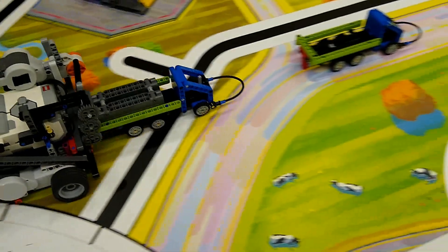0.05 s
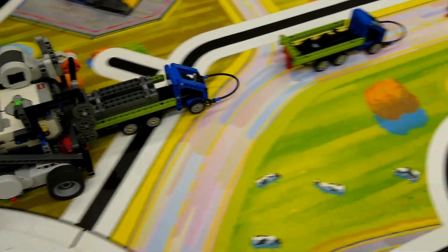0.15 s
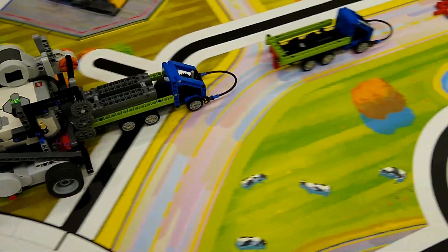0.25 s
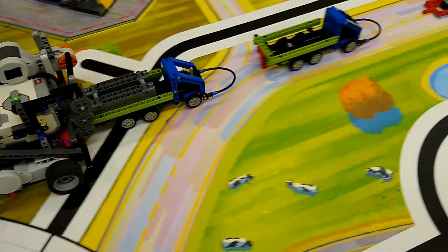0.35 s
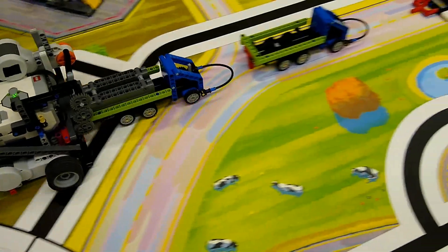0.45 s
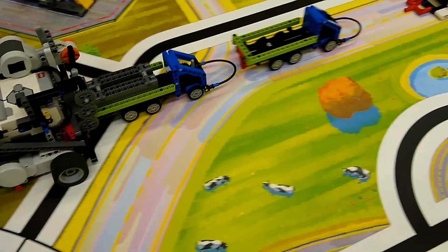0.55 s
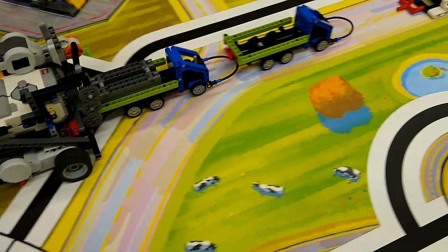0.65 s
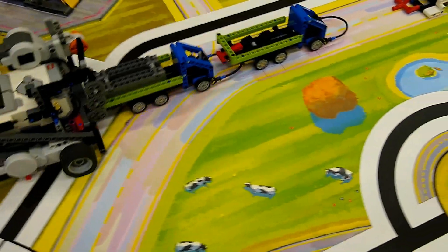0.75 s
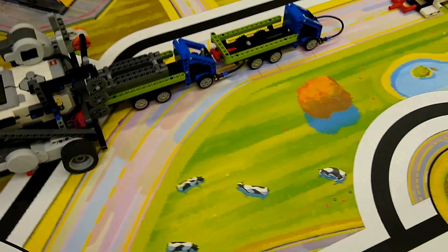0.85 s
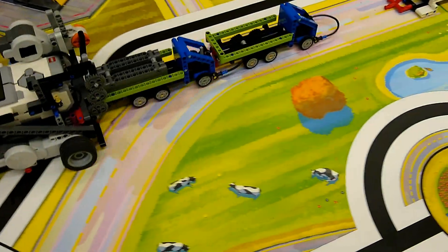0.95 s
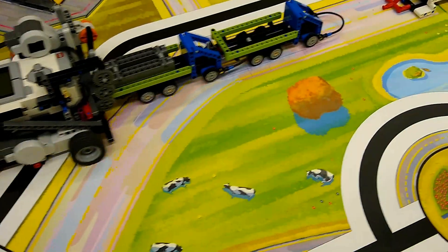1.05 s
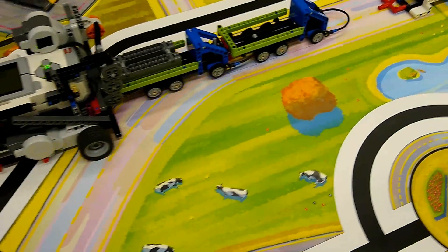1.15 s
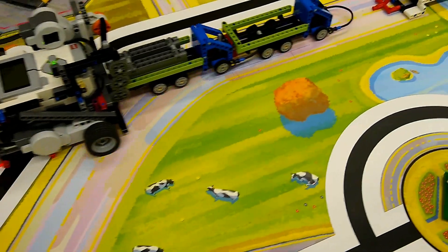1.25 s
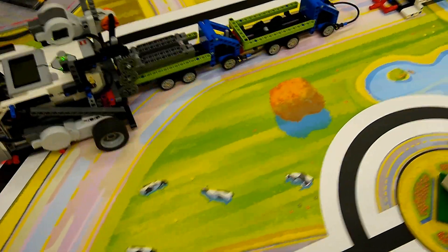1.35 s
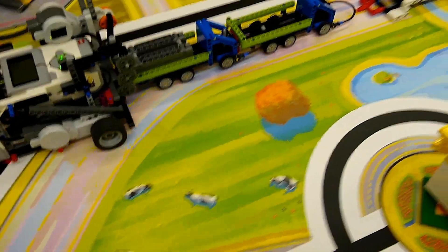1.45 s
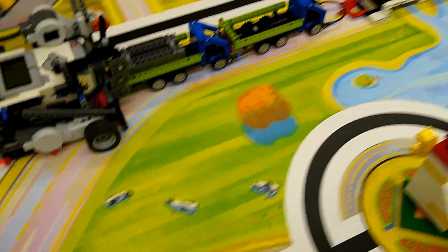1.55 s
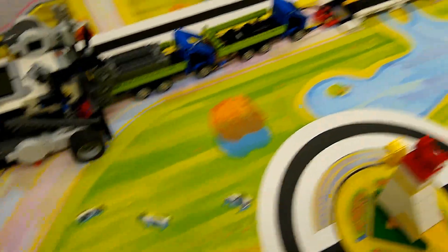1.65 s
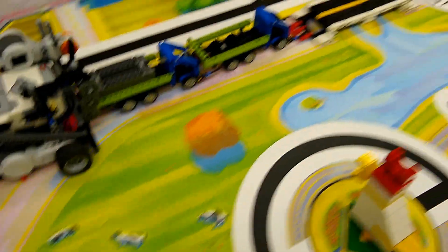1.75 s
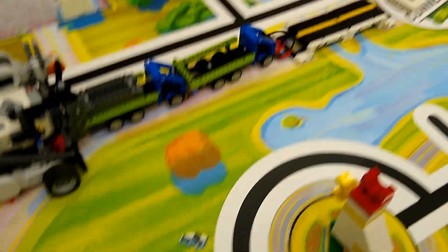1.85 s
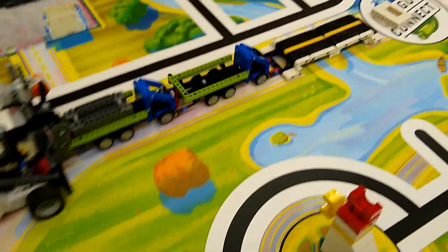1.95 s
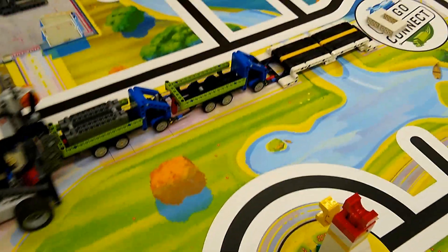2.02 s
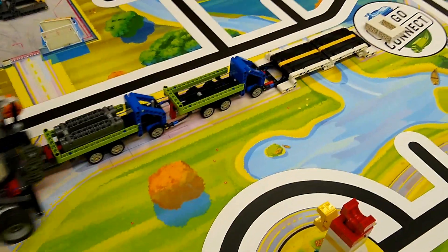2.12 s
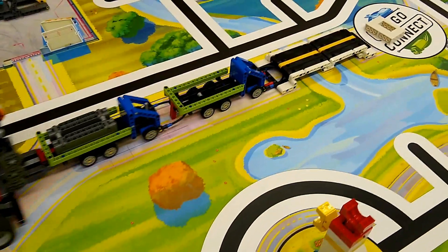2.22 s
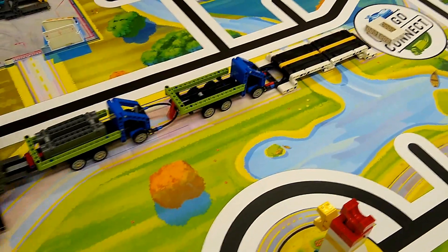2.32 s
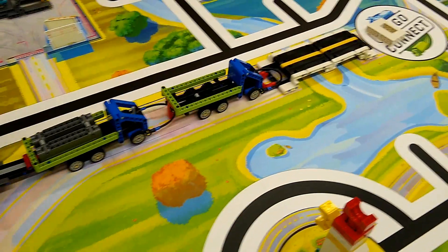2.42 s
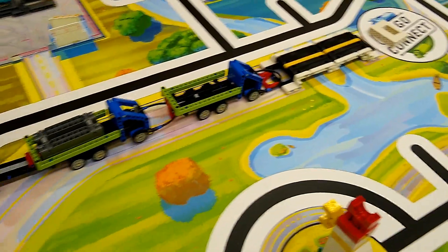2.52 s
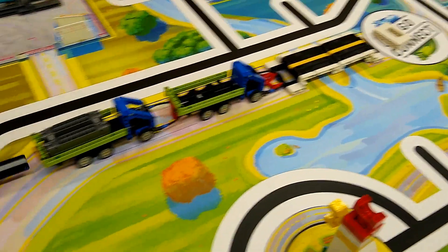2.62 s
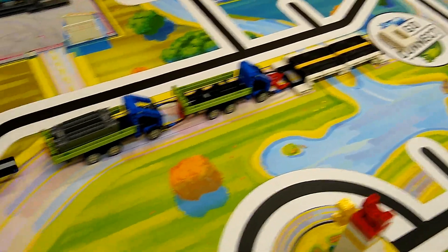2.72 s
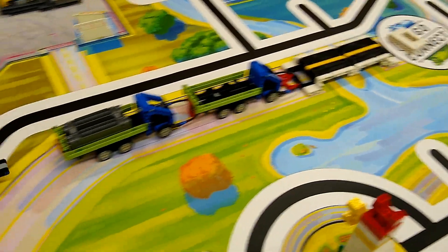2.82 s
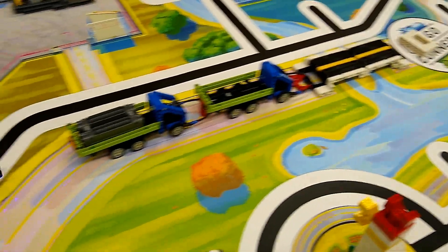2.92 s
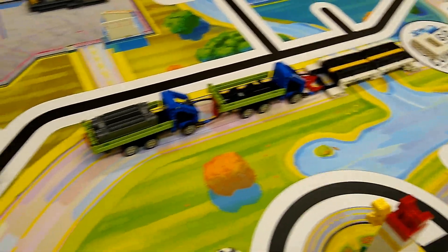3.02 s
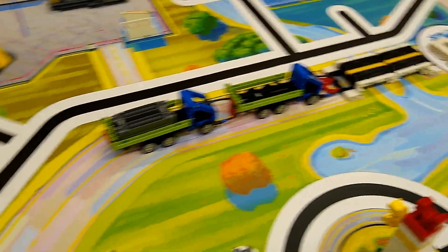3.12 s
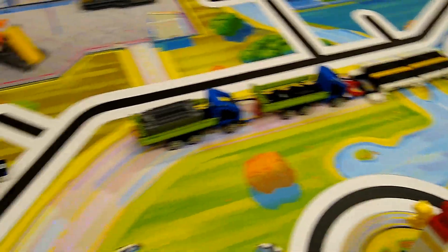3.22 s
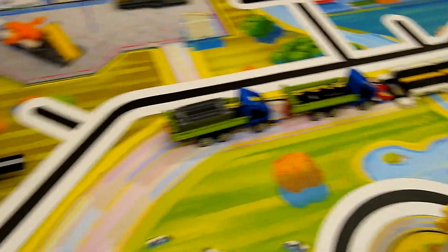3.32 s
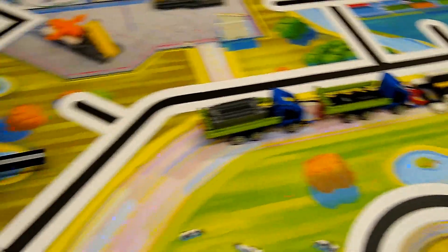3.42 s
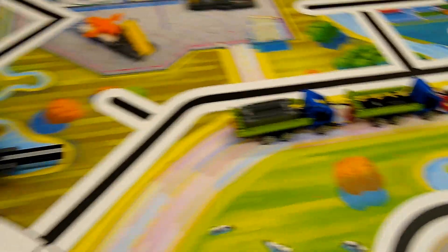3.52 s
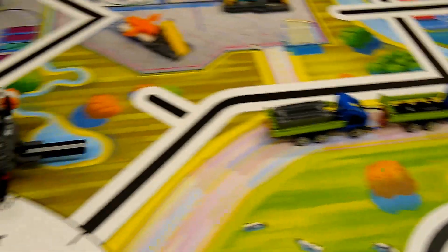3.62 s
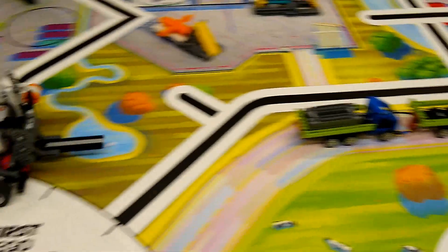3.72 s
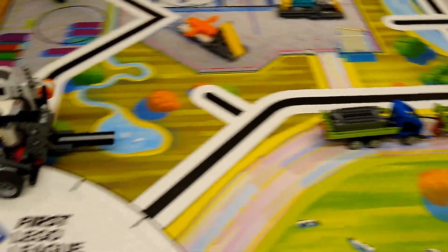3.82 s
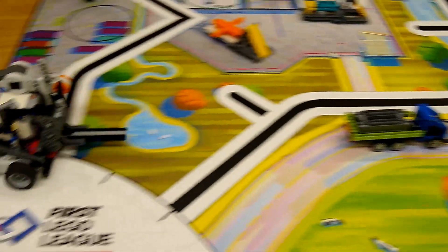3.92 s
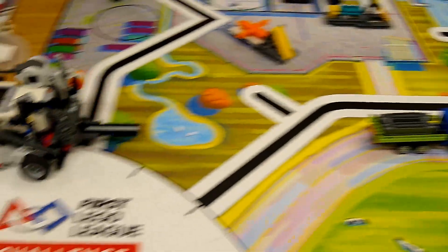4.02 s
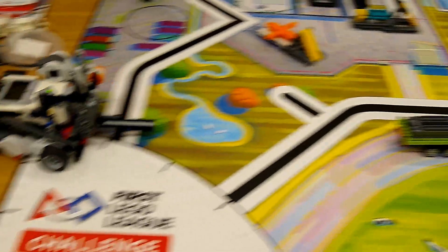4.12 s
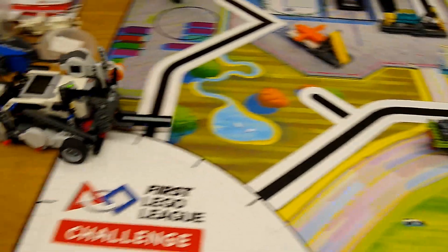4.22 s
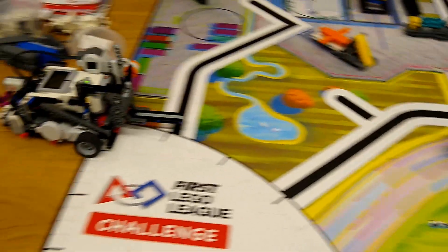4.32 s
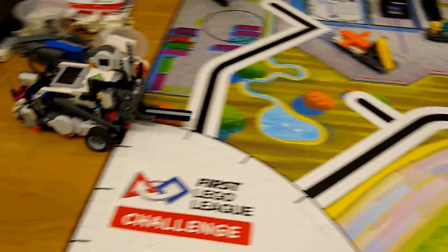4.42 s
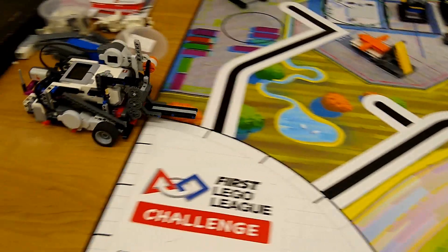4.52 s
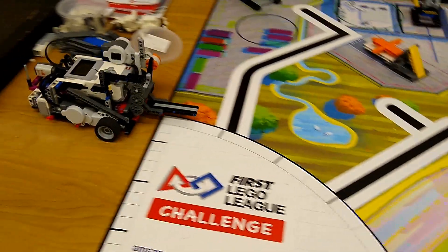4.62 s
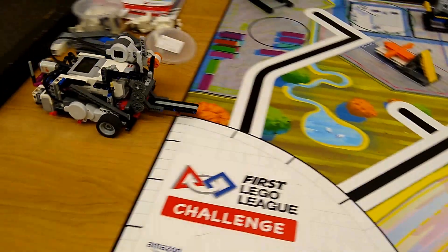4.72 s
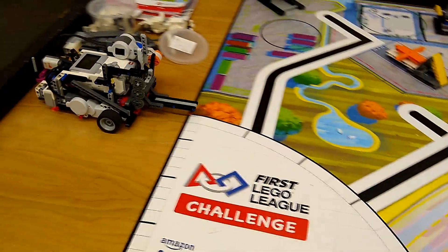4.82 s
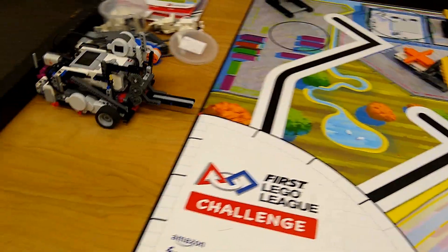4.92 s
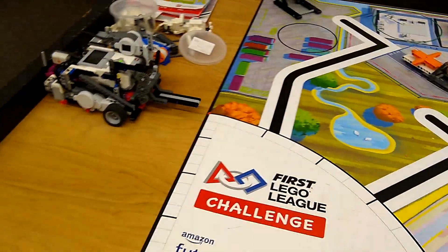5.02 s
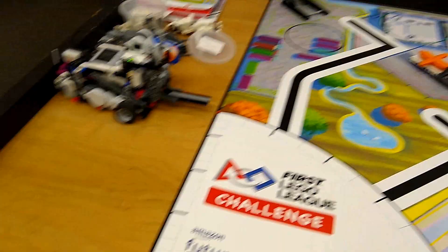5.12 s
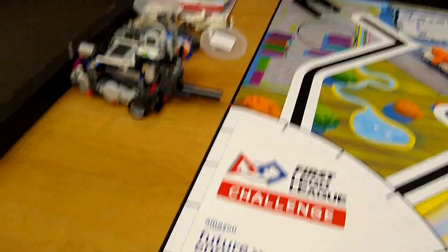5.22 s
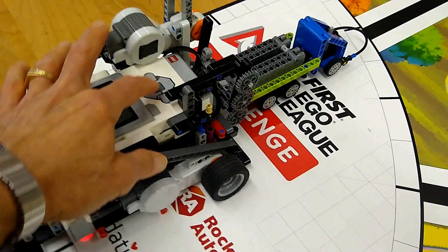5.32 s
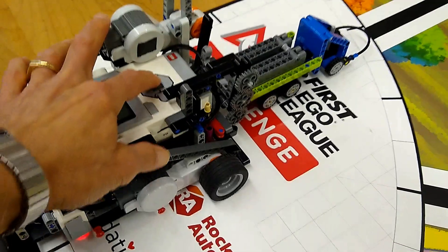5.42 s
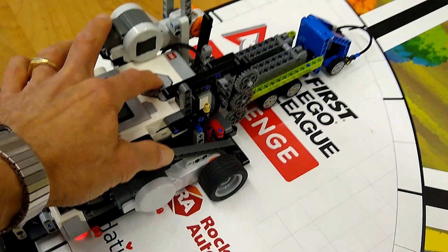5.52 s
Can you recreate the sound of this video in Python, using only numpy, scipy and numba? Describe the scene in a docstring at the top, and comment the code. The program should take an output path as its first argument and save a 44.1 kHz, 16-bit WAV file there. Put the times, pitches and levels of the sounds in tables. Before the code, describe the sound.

A plastic toy robot drives with a buzzing gear whine, pauses briefly, then clicks and backs away at a higher pitch.

```python
"""A plastic toy robot on a table mat, near a two-port microphone, in a quiet room with mains hum and a low
drone. It makes two short pushes forward: the gear teeth of two small motors click once a mesh and ring
the casing, and the mesh whines. At 2 s the gears knock and tick into reverse, and it runs faster,
backwards and away, turning its other face to the microphone. Just after 5 s it stops with two knocks and
the motors whistle faintly, holding still. The level dips briefly and leaves the room duller."""
import sys
import numpy as np
from scipy import signal
from scipy.fft import rfft, irfft
from scipy.io import wavfile
from scipy.ndimage import uniform_filter1d, map_coordinates
from numba import njit

SR = 44100
rng = np.random.default_rng(int(sys.argv[2]) if len(sys.argv) > 2 else 0)


def materialize(psi):
    """Save the field psi as 16-bit PCM at rate SR to the path in sys.argv[1].

    A 1-D psi becomes a single channel; in a 2-D psi each row is a channel.
    """
    bounded = np.clip(np.atleast_2d(psi).T, -1, 1)
    quanta = np.round(bounded * 32767).astype(np.int16)
    wavfile.write(sys.argv[1], SR, quanta)


N = 245195
T = np.arange(N) / SR
REVERSE_S = 2.06

# Gear slack taken up or let go: start_s, peak_db, thump_db, push_s, loose_rattle_db
SLACK_KNOCKS = [(1.991, -34, -77, 0.0076, -69), (2.081, -35, -48.5, 0.016, -47),
                (2.124, -48, -46.5, 0.0044, -53), (5.133, -37, -58, 0.017, -40),
                (5.189, -43, -52, 0.0073, -52)]


def undb(db):
    """Decibels to gain."""
    return 10 ** (np.asarray(db) / 20)


def level(x, db):
    """Scale to an rms level."""
    return x * undb(db) / np.sqrt(np.mean(x ** 2))


def on_log_hz(hz, table):
    """Read a table of pitch_hz, level_db along a log frequency axis."""
    pitch_hz, level_db = np.transpose(table)
    return np.interp(np.log(hz), np.log(pitch_hz), level_db)


def columns(rows):
    """The columns of a timed table, joined by straight lines."""
    time_s, *values = np.transpose(rows)
    return [np.interp(T, time_s, v) for v in values]


def walk(rate):
    """Random levels held 1 / rate s and slewed twice; spread near 1."""
    k = int(SR / rate)
    steps = np.repeat(rng.standard_normal(N // k + 1), k)
    return 1.4 * uniform_filter1d(uniform_filter1d(steps, k), k)[:N]


def sides(pan_db):
    """Gains at the two ports; pan_db is left minus right."""
    return undb(np.array([pan_db, -np.asarray(pan_db)]).reshape(2, -1) / 2)


@njit
def bandpass(x, hz, width_hz):
    """One resonance: a state-variable band-pass, gain 1 at the centre."""
    y, band, low = np.empty(len(x)), 0., 0.
    g, k = np.tan(np.pi * hz / SR), width_hz / hz
    for i in range(len(x)):
        v = (band + g * (x[i] - low)) / (1 + g * (g + k))
        band, low, y[i] = 2 * v - band, low + 2 * g * v, k * v
    return y


def room_tone(port_hz=515, duller_s=5.396, mains_hz=120, drone_hz=94):
    """Background hiss, alike at both ports only below port_hz, with mains hum and a low drone."""
    # Spectrum of the background hiss as heard, with a gap near 2.6 kHz: pitch_hz, relative_db
    hiss_spectrum = [(25, -33), (60, -9), (136, -3.5), (220, -5.5), (390, -8), (620, -10.5), (1240, -13),
                     (1950, -13.5), (2600, -37.5), (4000, -25), (8000, -31), (15500, -46.5)]
    # Swell of the drone: time_s, level_db
    drone_levels = [(0, -77), (.8, -71), (.92, -62), (1.55, -59.5), (1.9, -63), (2.1, -59), (2.4, -63.5),
                    (3.4, -61), (3.95, -61.5), (4.7, -73), (4.83, -58.5), (5.03, -91), (5.15, -59),
                    (5.3, -78)]
    mid, side = rfft(rng.standard_normal((2, N)))
    hz = np.maximum(np.arange(len(mid)) * SR / N, 1)
    apart = 1 / (1 + (port_hz / hz) ** 2.7)
    ports = (mid + apart * side * np.array([[1], [-1]])) / np.sqrt(1 + apart ** 2)
    hiss = level(irfft(undb(on_log_hz(hz, hiss_spectrum)) * ports, N), -56.5)
    dull = signal.sosfilt(signal.butter(1, 500, fs=SR, output="sos"), hiss)
    hiss = np.where(T < duller_s, hiss, dull + undb(-6) * (hiss - dull))
    hum = undb(-65.5 + 2 * walk(10)) * np.sin(2 * np.pi * mains_hz * T)
    rumble = level(bandpass(rng.standard_normal(N), 79., 35.), -7.5)
    drone_gain = undb(columns(drone_levels)[0] + .5 * walk(9.9))
    return hiss + hum + drone_gain * (np.sqrt(2) * np.sin(2 * np.pi * drone_hz * T) + rumble)


def drive(creep_hz=60., teeth_per_wheel_turn=490, catch_up_s=.32, brake_s=.19, strain_s=.13):
    """Two motors spin up, sag once a wheel turn and brake; rattle and whine follow speed and load."""
    # One row a run: start_s, stop_s, cruise_hz (tooth rate), spin_s, catch_up_hz (extra speed),
    # hardest_s (peak load), first_sag_share, second_sag_share, even_db (repeating part of the strikes),
    # loaded_db (its rise under load), rattle_db, whine_db, swell_db (whine under load),
    # surge_db (rattle at spin-up), strain_db (whine at spin-up)
    runs = [(-1, .94, 679, .07, 0, .29, .022, .068, -16, 10, -39.5, -53, 1.2, 0, 0),
            (1.04, 1.965, 662, .11, 320, 1.8, .01, .055, -17, 12, -40.5, -55, 1.5, 2, 5),
            (2.075, 5.088, 1008, .12, 0, 3.8, .04, .045, -18, 2, -36, -61, .5, 0, 11)]
    motors_hz = np.full((2, N), creep_hz)
    detune = np.array([[1], [1.004]])
    rattle_gain, whine_gain, alike_db = np.zeros((3, N))
    for (start_s, stop_s, cruise_hz, spin_s, catch_up_hz, hardest_s, first_sag, second_sag,
         even_db, loaded_db, rattle_db, whine_db, swell_db, surge_db, strain_db) in runs:
        age, braked_s = np.maximum(T - start_s, 0), np.maximum(T - stop_s, 0)
        catching_up = 1 + catch_up_hz / cruise_hz * np.exp(-(age / catch_up_s) ** 2)
        rising = catching_up * (1 - np.exp(-age / spin_s))
        wheel_turns = (T - hardest_s) * cruise_hz / teeth_per_wheel_turn
        load = np.cos(np.pi * wheel_turns) ** 2
        uneven = 1 - np.array([first_sag * load ** 2, second_sag * load ** 4])
        easing_s = np.maximum(T - stop_s + .03, 0)  # speed falls just before the brake bites
        slowing = np.clip(1 - (easing_s / brake_s) ** 2, 0, 1)
        motors_hz = np.maximum(motors_hz, cruise_hz * rising * slowing * uneven * detune)

        # Strikes repeat more exactly while the motors strain.
        strain = age / strain_s * np.exp(1 - age / strain_s)
        run_alike_db = even_db + loaded_db * load ** 5 * (age > strain_s) + 7.5 * strain
        alike_db = np.where(T > start_s, run_alike_db, alike_db)

        octaves = np.log2(rising + 1e-9)
        surge_age = age / (1.27 * spin_s)
        surge = surge_age ** 2 * np.exp(1 - surge_age ** 2)
        stirring = np.interp(T, (start_s - .016, start_s), (0, 1))  # gears stir before the wheels move
        speed_db = np.maximum(7.5 * octaves, -8)
        rattle_gain += stirring * undb(rattle_db + speed_db + surge_db * surge - 278 * braked_s)
        swell = np.cos(2 * np.pi * (wheel_turns + .06))  # peaks just before the speed sags
        whine_gain += undb(whine_db + 9 * octaves + strain_db * strain + swell_db * swell - 400 * braked_s)
    return motors_hz, rattle_gain, whine_gain, alike_db


def tooth_strikes(tooth_hz, alike_db, burst_share=.2, scatter_db=1.8, rub=.45):
    """Each strike is a burst of its own size over steady rubbing; the part that repeats gives overtones."""
    # Overtones of the repeating part: multiple, relative_db
    overtones = [(3, -3), (4, -2), (5, 0), (6, -4), (7, -1), (8, 2), (9, 0), (10, -6)]
    teeth = np.cumsum(tooth_hz) / SR
    size = undb(scatter_db * rng.standard_normal(int(teeth[-1]) + 1))[teeth.astype(int)]
    scrape = level(rng.standard_normal(N) * (size * np.exp(-(teeth % 1) / burst_share) + rub), 0)
    phase = 2 * np.pi * teeth + .09 * walk(150)
    alike = sum(undb(db + 3.2 * walk(14)) * np.cos(k * phase + 2 * np.pi * rng.random())
                for k, db in overtones)
    return scrape + undb(alike_db) * level(alike, 0)


def facing(forwards, backwards, far):
    """What faces the microphone: one side going forwards, then a slow turn as the robot backs away."""
    gone = np.interp(T, (3.16, 5.03), (0, 1))
    return np.where(T < REVERSE_S, forwards, (1 - gone) * backwards + gone * far)


def casing_rattle(first_hz, second_hz, alike_db, panel_db, back_db):
    """Strikes of both motors, a little out of step, ring the casing; each port favours its nearer motor."""
    # Broad colour of the rattle as heard, with a deep gap near 2.6 kHz going forwards:
    # pitch_hz, forwards_db, backwards_db, far_db, pan_db
    colour = [(594, -35, -43, -20, 2), (900, -34, -37, -16, -17), (1240, -6, -11.5, -9.5, -2.5),
              (2130, -7, -5.5, 1, 1.5), (2600, -64, -12, -6.5, 10), (3207, -2.5, -3, 2, 6.5),
              (4300, 3.5, -7, 0.5, -3), (4920, 3, -7, -6, 0.5), (6240, 5.5, -7, 5, -1.5),
              (7540, 6.5, 4.5, 2, 9.5), (9830, 5, 0.5, -2.5, -13.5), (11500, 6, -0.5, 2, 0.5),
              (13170, 7, -4.5, 0.5, 0), (17000, -17, -7.5, -14, 15)]
    # Sharper modes on top: pitch_hz, width_hz, forwards_db, backwards_db, far_db, pan_db
    casing_modes = [(4400, 990, -59, -22, -20.5, 3), (4940, 550, -63, -24.5, -15, 4.5),
                    (6530, 210, -44, -17, -18, 7), (10180, 850, -26, -18.5, -10.5, -3.5)]
    # Two bright modes that face the microphone by turns: time_s, lower_db, upper_db
    glints = [(0, -35, -23), (2.1, -31, -15.5), (2.4, -30, -17), (2.8, -36, -17.5), (3.2, -24, -17.5),
              (3.5, -24, -15.5), (3.75, -7.5, -24), (4.05, -5.5, -12), (4.35, -19, -30), (4.6, -5, -22),
              (4.85, -13, -12), (5.1, -12, -10)]
    motors = np.array([tooth_strikes(second_hz, alike_db), tooth_strikes(first_hz, -13.5)])
    farther_motor = signal.sosfilt(signal.butter(2, 9500, fs=SR, output="sos"), motors[::-1])
    strikes = motors + undb(-4.5) * farther_motor
    bins_hz = np.maximum(np.arange(N // 2 + 1) * SR / N, 1)
    *colours_db, pan_db = (on_log_hz(bins_hz, np.array(colour)[:, [0, k]]) for k in range(1, 5))
    broad = facing(*(irfft(rfft(strikes) * undb(db) * sides(pan_db), N) for db in colours_db))
    out = undb(.64 * walk(14) + .32 * walk(6.94)) * broad / strikes.std()

    def ring(hz, width_hz):
        """One struck mode, rms 1."""
        return level(np.array([bandpass(x, float(hz), float(width_hz)) for x in strikes]), 0)

    out += undb(panel_db) * sides(8) * ring(7500, 900)  # side panel
    out += undb(back_db + 1.6 * walk(16)) * sides(2) * ring(5854, 250)  # back plate
    for hz, glint_db in zip((9620, 10470), columns(glints)):
        out += undb(glint_db + .91 * walk(13)) * sides(2.5) * ring(hz, 300)
    for hz, width_hz, *faces_db, pan_db in casing_modes:
        rocking_db = 2 * walk(5) + 1.5 * walk(14)  # the body rocks each mode on and off the microphone
        out += undb(facing(*faces_db) + rocking_db) * sides(pan_db) * ring(hz, max(width_hz, 280))
    return level(out, 0)


def shielding_db(hz):
    """Going forwards, the load hides the low whine."""
    return (T < REVERSE_S) * np.interp(hz, (980, 1110), (-22, 0))


def mesh_whine(tooth_hz):
    """Low multiples of one motor's tooth rate; teeth come early or late, which smears the higher ones."""
    # How well the casing radiates the whine: pitch_hz, gain_db
    response = [(500, -34), (690, -26), (735, 2), (765, 2), (805, -20), (845, -14), (885, 3), (925, -12),
                (965, -6), (1020, -5), (1100, -7), (1200, 3), (1260, 0), (1350, 1), (1600, -6), (1800, 0),
                (2000, -6), (2200, -13), (2700, -14), (3400, -8), (4100, -13)]
    wavering_hz = tooth_hz * (1 + .0075 * walk(60) + .005 * walk(14))
    phase = 2 * np.pi * np.cumsum(wavering_hz) / SR + .2 * walk(300)
    out = np.zeros(N)
    for k in range(1, 7):
        gain_db = on_log_hz(k * tooth_hz, response) + shielding_db(k * tooth_hz) + 3.2 * walk(22)
        out += undb(gain_db) * np.sin(k * phase + 2 * np.pi * rng.random())
    return out


def axle_whine(tooth_hz, ratio=1.714):
    """A second gear pair adds one tone, heard only while pushing forwards."""
    hz = ratio * tooth_hz
    phase = 2 * np.pi * np.cumsum(hz * (1 + .008 * walk(40))) / SR
    return (T < REVERSE_S) * undb(-11.5 + 3 * walk(15) + shielding_db(hz)) * np.sin(phase)


def gear_knocks():
    """Slack in the gears sends a clunk through the frame modes and a dull thump through the table."""
    # Modes of the frame: pitch_hz, relative_db
    frame_modes = [(640, 11), (1150, -20), (1500, 8), (2200, 1), (4200, 0), (8000, -13.5)]
    out = np.zeros(N)
    for start_s, peak_db, thump_db, push_s, _ in SLACK_KNOCKS:
        age = np.maximum(T - start_s, 0) / push_s
        blow = rng.standard_normal(N) * np.sqrt(age) * np.exp(-2 * age)
        clunk = sum(undb(db) * bandpass(blow, float(hz), hz / 2.1) for hz, db in frame_modes)
        thump = bandpass(bandpass(blow, 170., 160.), 172., 90.)
        out += undb(peak_db) * clunk / np.abs(clunk).max() + undb(thump_db) * thump / np.abs(thump).max()
    return out


def decay(start_s, decay_s):
    """A sudden onset that dies away exponentially."""
    return (T > start_s) * np.exp(-np.maximum(T - start_s, 0) / decay_s)


def loose_gear_gain():
    """Gain of the brief rattle of free gears after each knock."""
    return sum(undb(db) * decay(start_s, .0063) for start_s, *_, db in SLACK_KNOCKS)


def reversal_ticks():
    """Hard plastic teeth meet in short bright cracks as the gears reverse."""
    # Tooth contacts: start_s, level_db
    contacts = [(2.0695, -44), (2.0799, -37), (2.085, -32), (2.127, -39)]
    envelope = sum(undb(db) * decay(start_s, .0012) for start_s, db in contacts)
    return envelope * bandpass(rng.standard_normal(N), 6500., 12000.)


def holding_whistle(start_s=5.18, end_s=5.385, pitch_hz=1960):
    """The motors whistle faintly while they hold still."""
    return (T > start_s) * (T < end_s) * undb(-69 + 4.2 * walk(24)) * np.sin(2 * np.pi * pitch_hz * T)


@njit
def wall_echo(x, lags, gain, damp):
    """Sound passing between the walls: eight delay lines feed each other, duller on every round."""
    line, soft, out = np.zeros((8, 4096)), np.zeros(8), np.zeros((2, len(x)))
    for i in range(len(x)):
        total = 0.
        for k in range(8):
            soft[k] += (1 - damp) * (gain[k] * line[k, (i - lags[k]) & 4095] - soft[k])
            total += soft[k]
            out[k % 2, i] += soft[k]
        for k in range(8):
            line[k, i & 4095] = x[i] + soft[k] - total / 4
    return out


def scene(t60_s=.3):
    """The robot a little left of the microphone, direct and off the walls, over the room tone."""
    # The robot's path as the microphone hears it: time_s, distance_gain_db, side_panel_db,
    # back_plate_db, whine_db, pan_db, left_lead_s
    path = [(0, -0.5, -30, -42, 0.5, -1.5, 0.0002), (.55, 0, -32, -47, 2, -2, 0.0002),
            (.9, 0, -33, -17, -1, -1.5, 0.00022), (1.3, -0.5, -27, -36, -0.5, -2.5, 0.00019),
            (2.0, 1, -59, -17, 1, -2.5, 0.0002), (2.5, 3.5, -20, -10.5, -0.5, -4, 0.00025),
            (2.8, 3, -13, -12.5, 5.5, -3, 0.00027), (3.25, 3, -23, -12.5, 2, -3.5, 0.00028),
            (3.6, 0, -20, -9, 1.5, -3.5, 0.00023), (3.8, -0.5, -19.5, -6, 5, -4.5, 0.0002),
            (4.25, -1.5, -38, -8.5, 5, -3.5, 0.00015), (4.6, -1.5, -14, -6, 1, -3.5, 0.0001),
            (4.85, -2, -23, -11.5, 4, -4.5, 0.000096), (5.1, -3.5, -22, -11, -1, -4, 0.00011)]
    distance_db, panel_db, back_db, whine_db, pan_db, lead_s = columns(path)
    (first_hz, second_hz), rattle_gain, whine_gain, alike_db = drive()
    whistle = holding_whistle()
    whine = sides(-2.5) * mesh_whine(first_hz) + sides(-.76) * undb(-8) * mesh_whine(second_hz)
    whine += sides(-4) * axle_whine(first_hz)
    rattle = casing_rattle(first_hz, second_hz, alike_db, panel_db, back_db)
    rattle *= (rattle_gain + loose_gear_gain()) * undb(distance_db) * sides(pan_db)
    robot = rattle + whine_gain * undb(whine_db) * whine + whistle + gear_knocks() + reversal_ticks()
    late_right = map_coordinates(robot[1], [np.arange(N) - SR * lead_s], order=3)
    direct = np.array([robot[0], late_right])
    lags = rng.integers(400, 1800, 8)
    echo = wall_echo(robot.mean(axis=0), lags, undb(-60 * lags / SR / t60_s), damp=.4)
    return direct + undb(-8) * echo + room_tone()


def record(dry, low_hz=44.2, top_hz=15750):
    """The microphone loses the deep bass; the level dips briefly near the end; the top is cut off."""
    dip_db = uniform_filter1d(-15. * ((T > 5.386) & (T < 5.396)), size=220)
    heard = signal.sosfilt(signal.butter(2, low_hz, "high", fs=SR, output="sos"), dry)
    return signal.sosfilt(signal.ellip(10, .2, 80, top_hz, fs=SR, output="sos"), undb(dip_db) * heard)


dry = scene()
out = record(dry)
materialize(out)
```